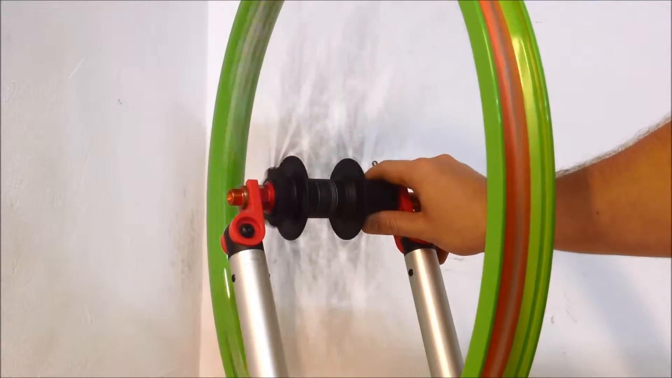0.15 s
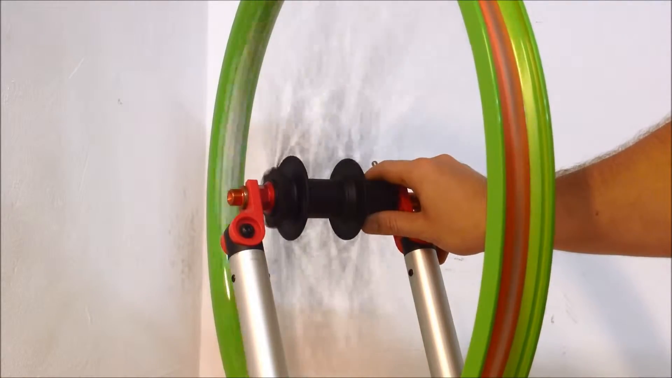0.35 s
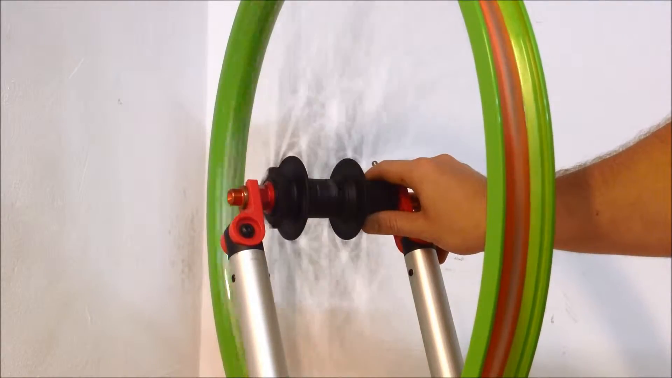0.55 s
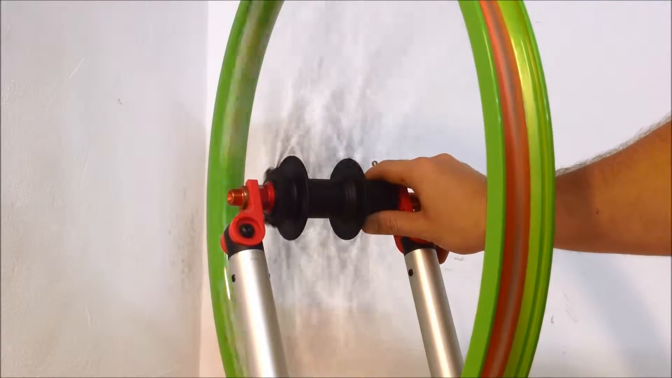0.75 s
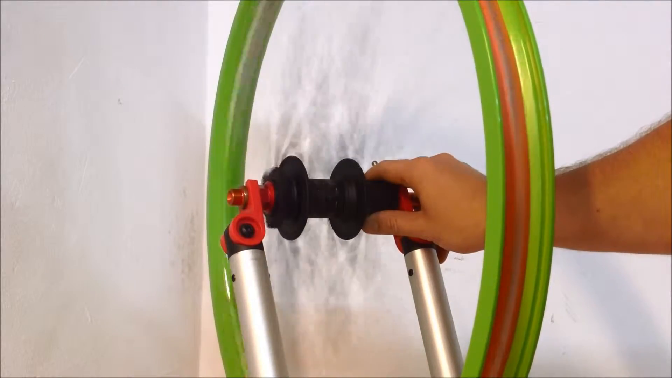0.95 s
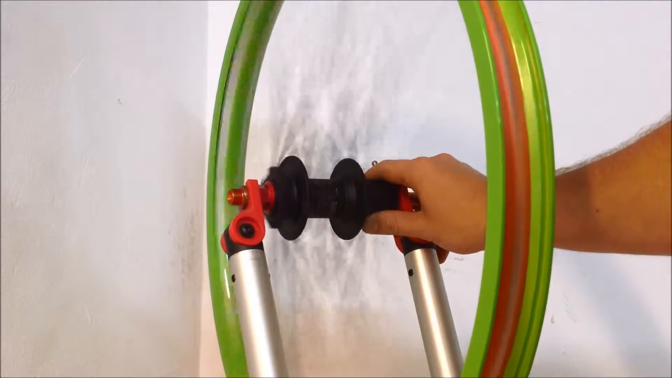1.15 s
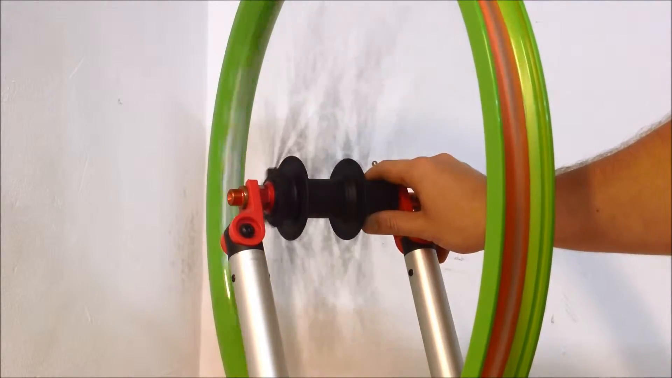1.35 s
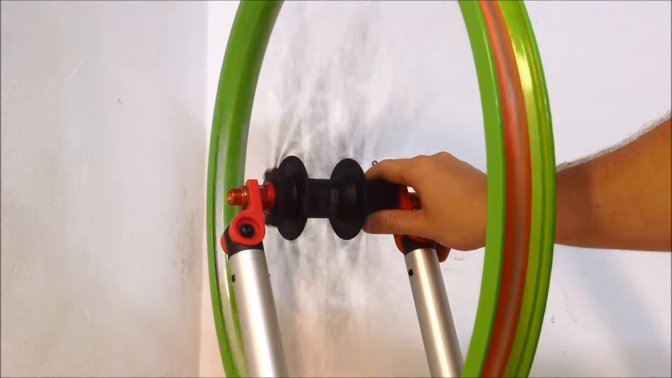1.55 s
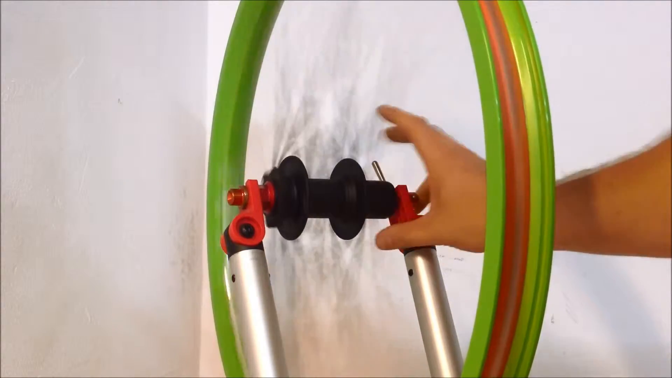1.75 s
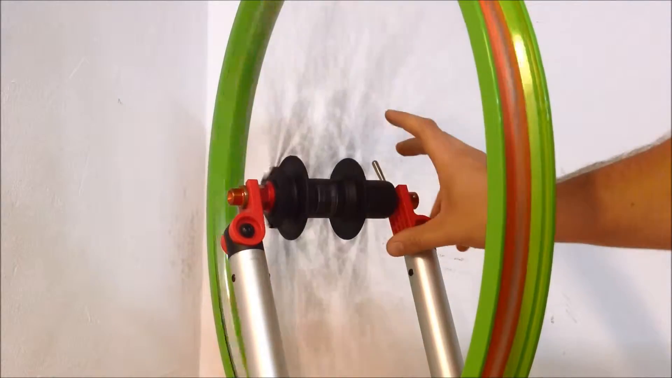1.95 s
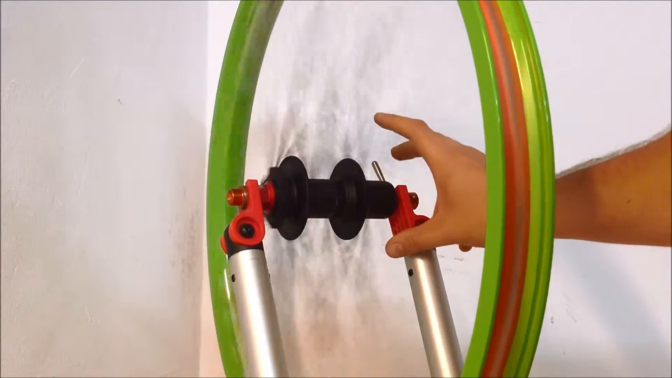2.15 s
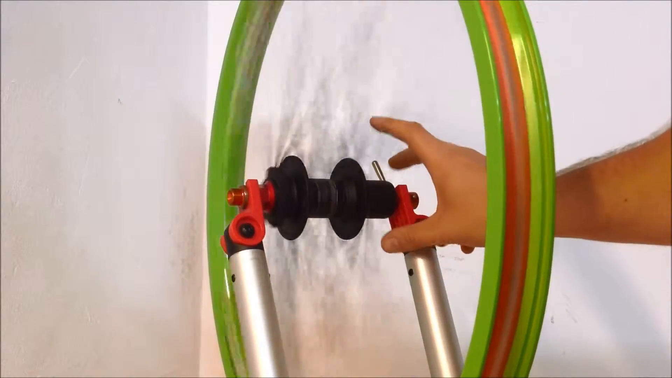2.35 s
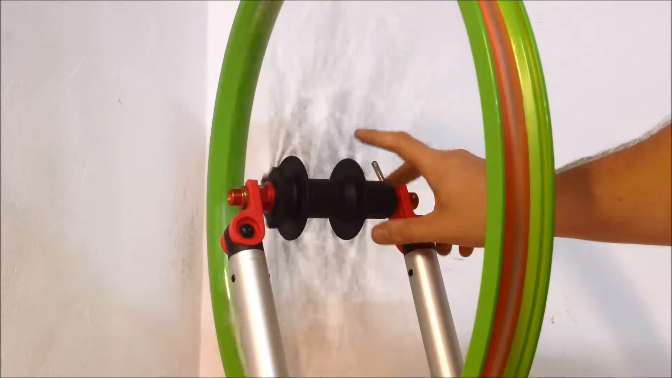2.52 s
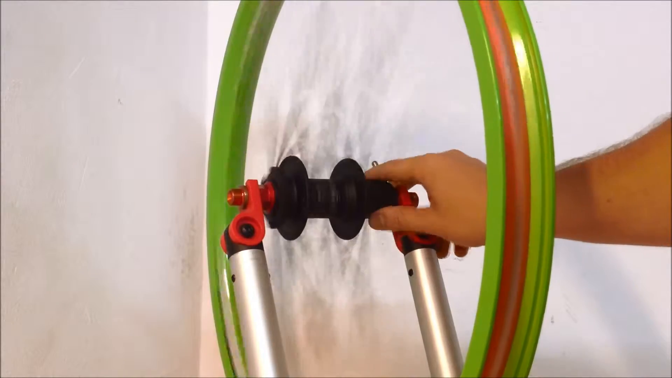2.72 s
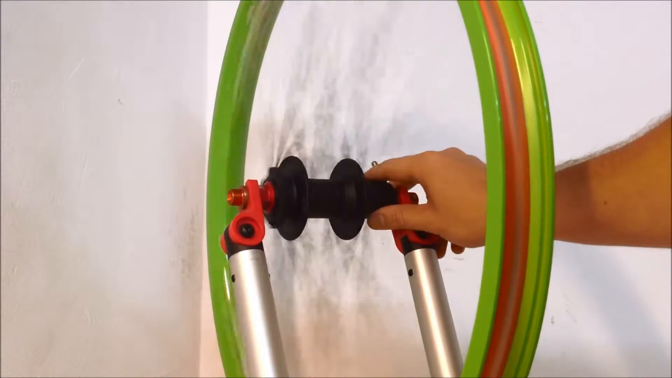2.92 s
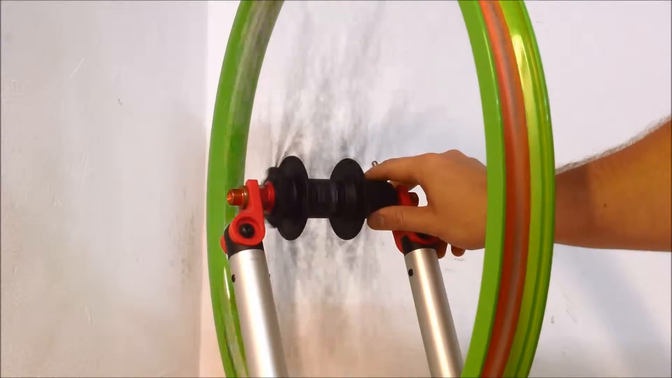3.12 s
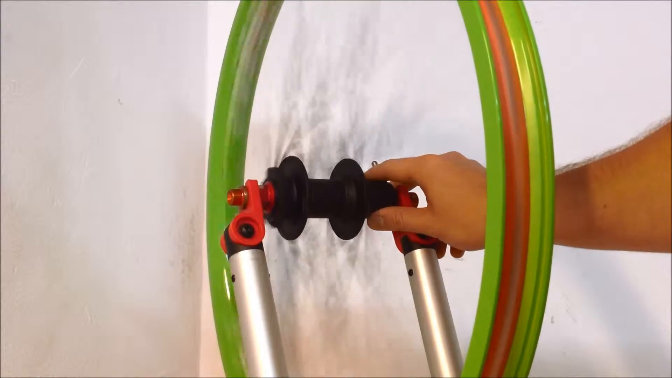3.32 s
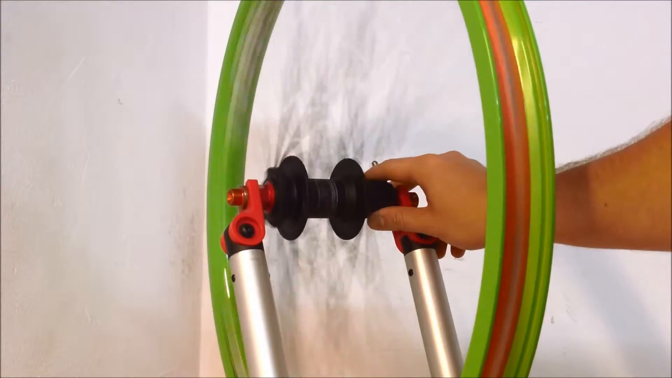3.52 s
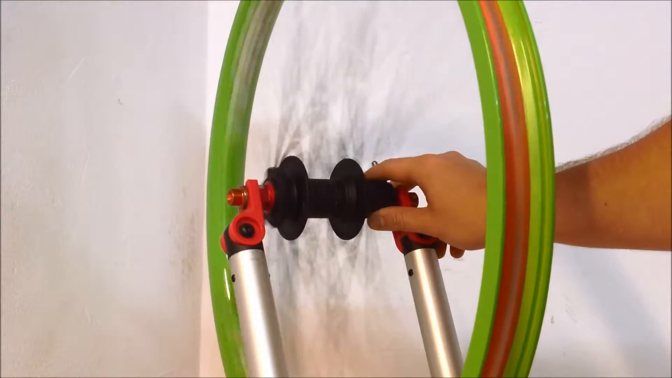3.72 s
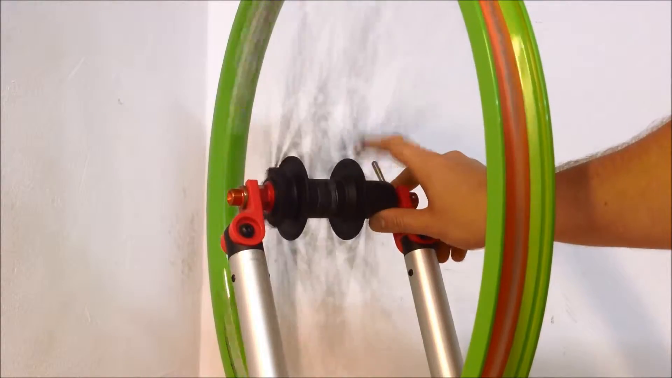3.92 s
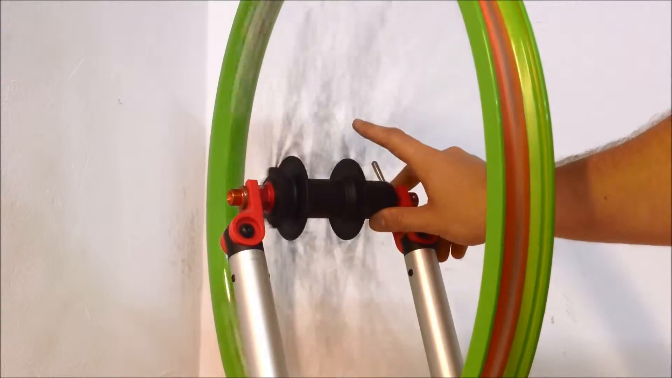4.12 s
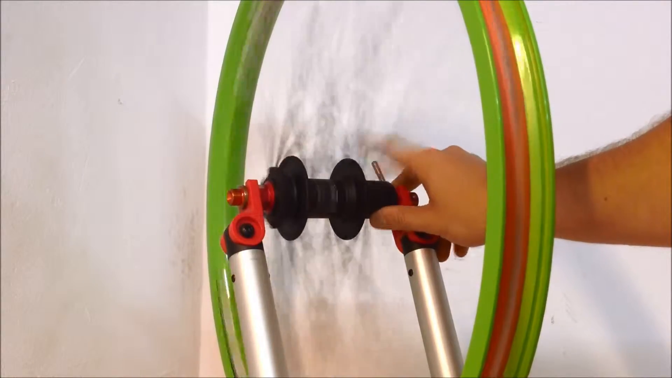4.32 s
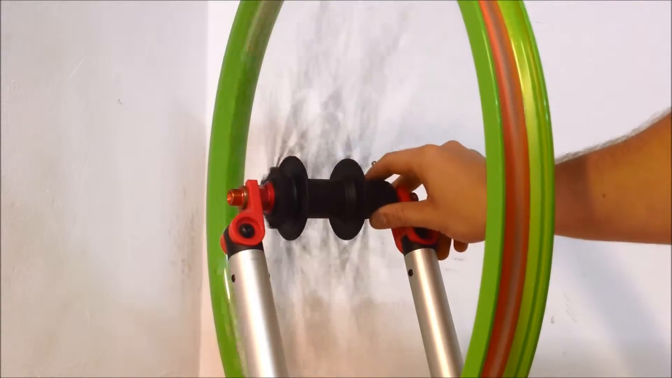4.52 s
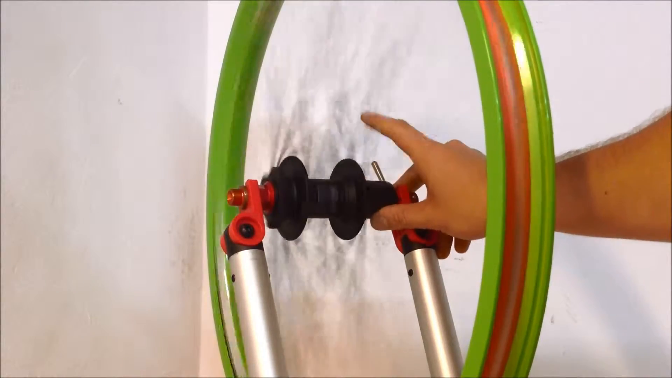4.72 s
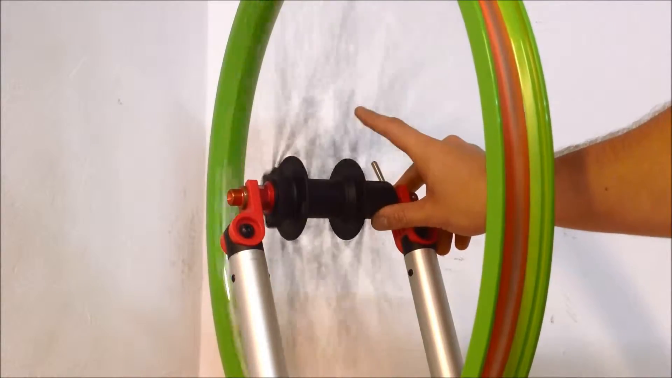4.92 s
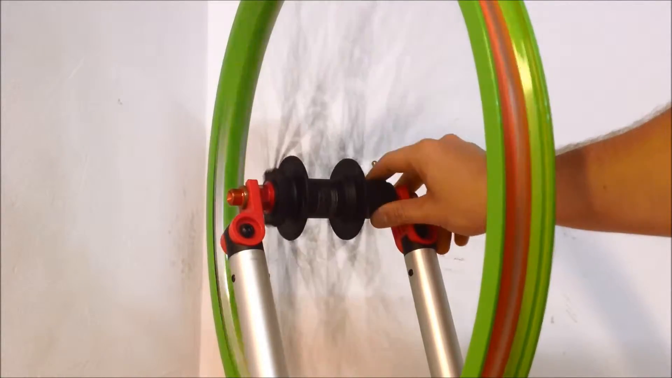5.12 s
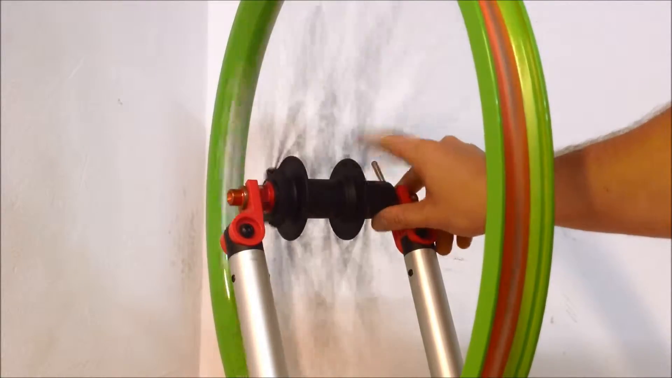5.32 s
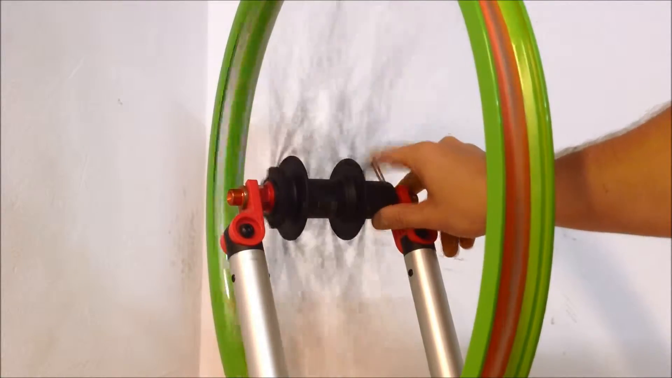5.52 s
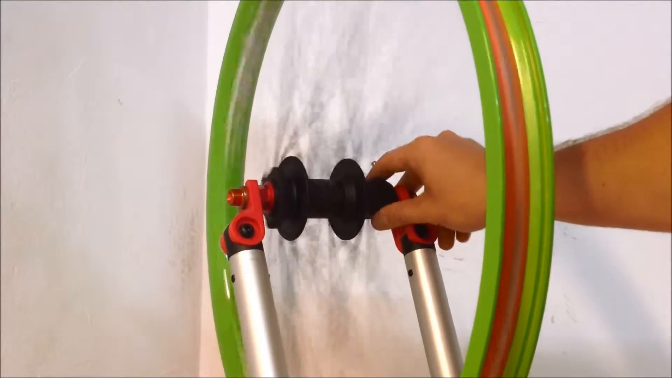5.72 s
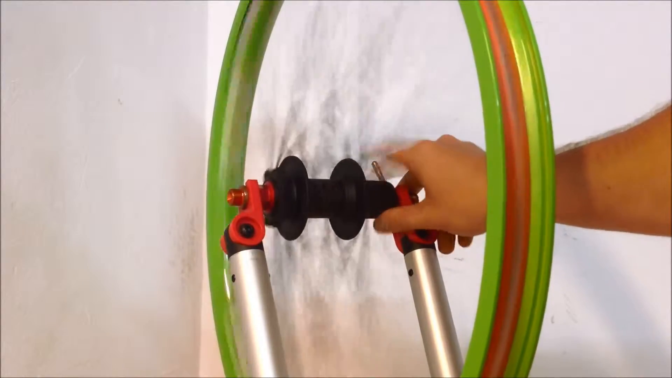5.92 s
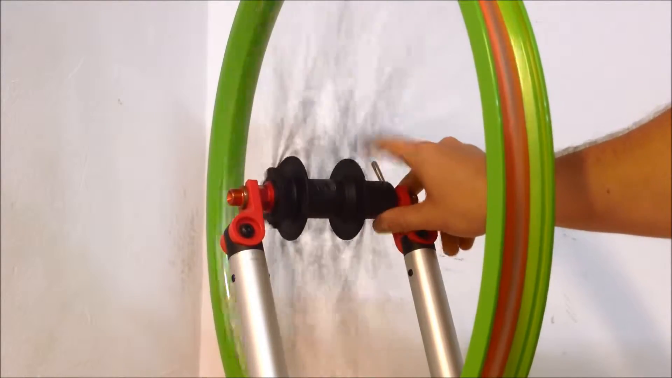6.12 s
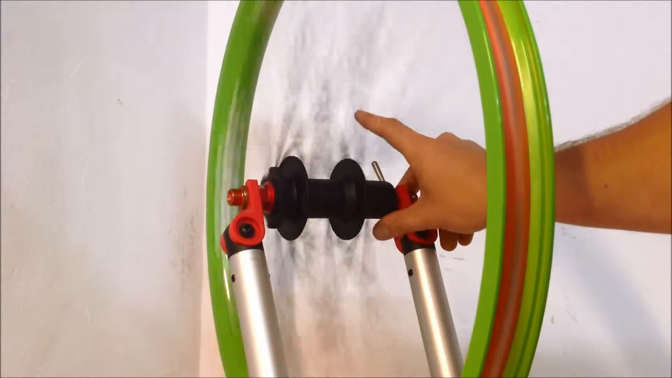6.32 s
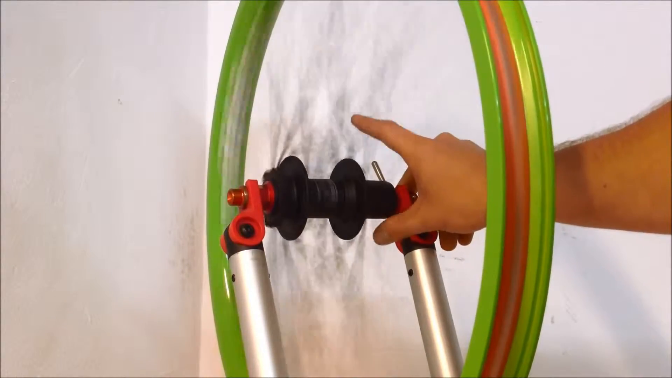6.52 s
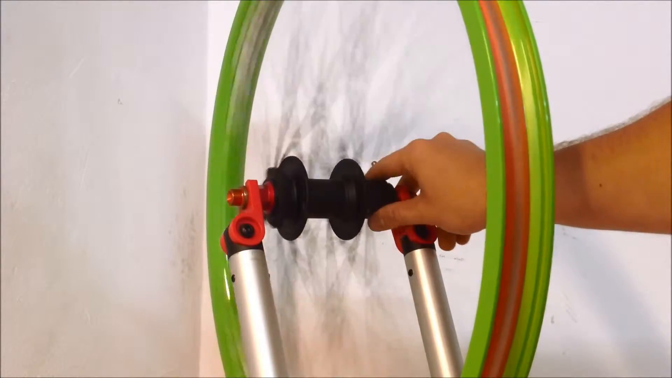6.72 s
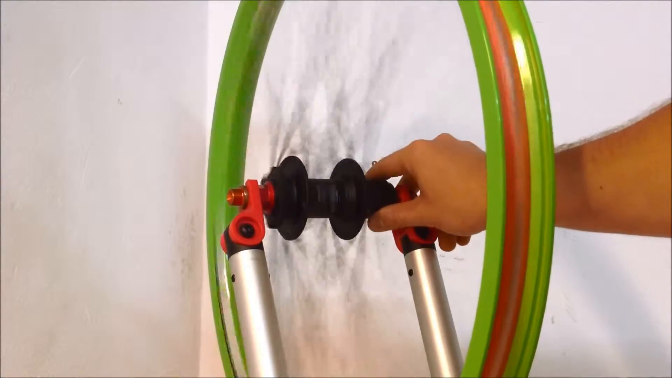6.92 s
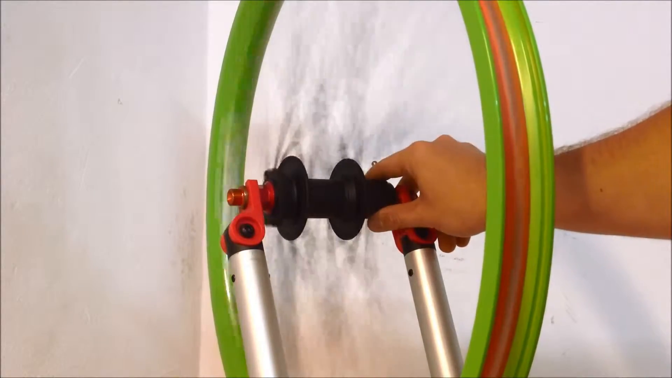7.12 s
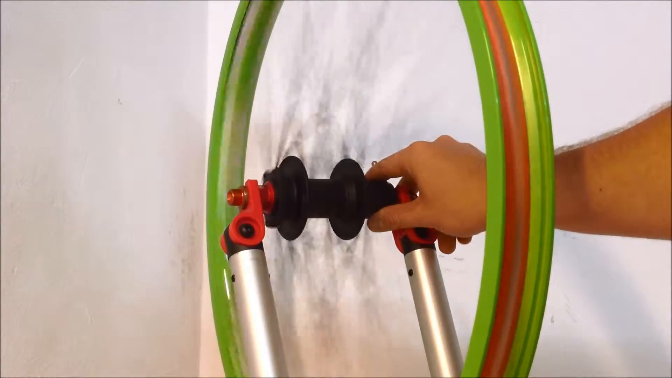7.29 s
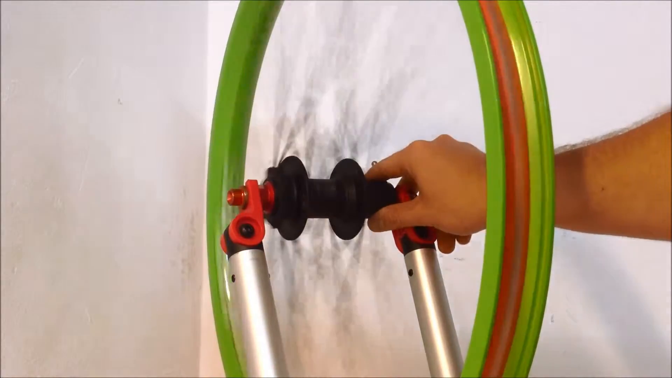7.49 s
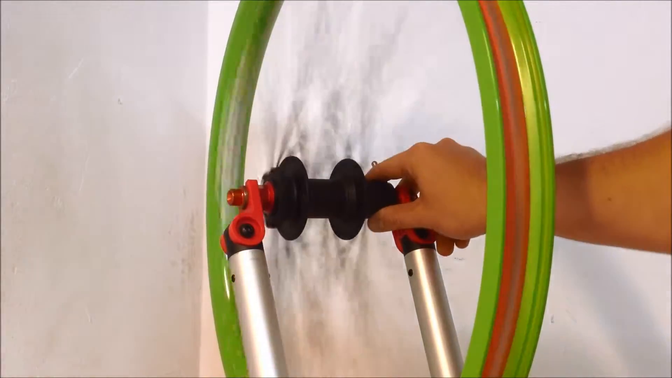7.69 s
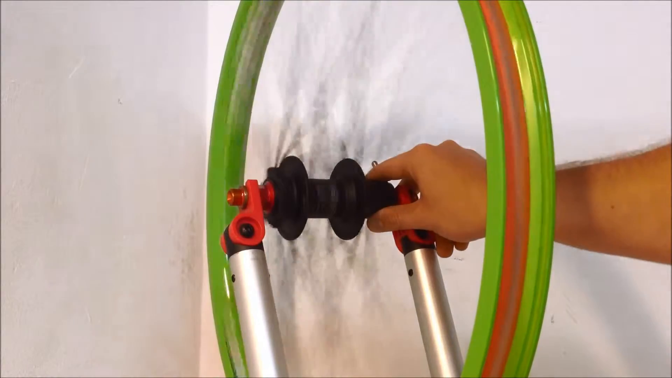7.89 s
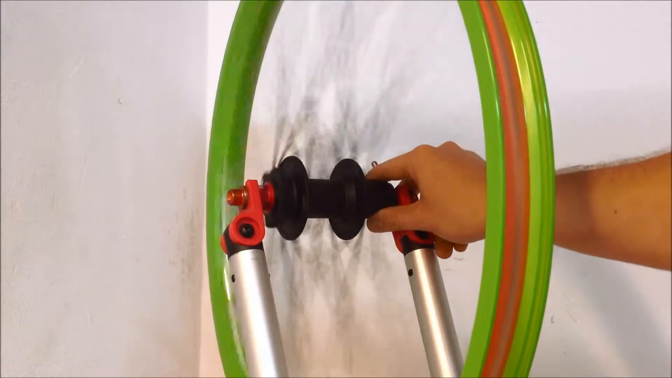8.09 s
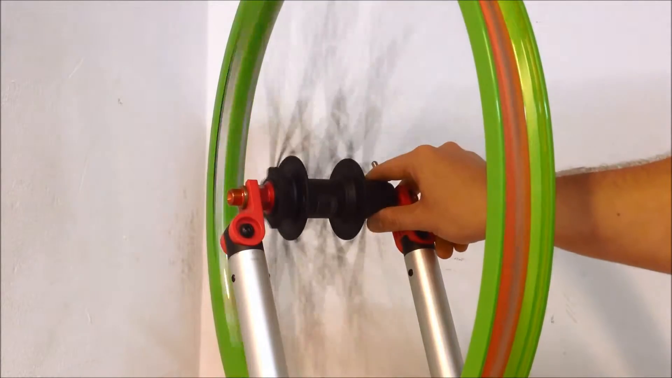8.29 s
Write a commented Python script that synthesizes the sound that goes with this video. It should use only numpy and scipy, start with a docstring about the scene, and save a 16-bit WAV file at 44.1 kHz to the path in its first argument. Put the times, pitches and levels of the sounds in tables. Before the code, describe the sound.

Close to a coasting bicycle wheel in a small hard room, crisp metallic ratchet clicks are already running, roughly forty-odd a second and gradually slowing, each a tiny bright volley with ringing rim and spokes. They stop at 1.7 s, leaving short room ring, faint low rumble, soft hiss, a light hand rustle and a dull bump near 2.1 s. At 2.8 s a tap and low thump of the stand bring the clicking back until 3.9 s. Rustles and bumps follow, then a burst at 4.4-4.7 s. From 5.0 to 6.2 s come stuttering bursts of only a few clicks, with grab thumps and one thin, bright late snap at 5.6 s. After a quiet gap, a thump at 6.7 s starts a steady final run, slower at about thirty-two clicks a second, with dull bumps beneath, lasting to the end around 8.3 s.

```python
"""Quick ratchet clicks come first, over a low rumble and a soft hiss: a bicycle wheel coasts in a truing stand
in a small hard room. Whenever a hand holds the freehub body still, its pawls drop off tooth after tooth,
slower as the wheel slows. Each click is a volley of tiny blows that makes rim and spokes ring.
Dull bumps are puffs of low noise; grabs add a tap and a thump of the stand, and one late tooth snaps brightly.
Soft rustles of shaped noise accompany the moving hand."""
import sys
import numpy as np
from scipy import signal
from scipy.fft import rfft, irfft, next_fast_len
from scipy.io import wavfile
from scipy.ndimage import map_coordinates

SR = 44100
rng = np.random.default_rng(int(sys.argv[2]) if len(sys.argv) > 2 else 0)


def wav_out(sig):
    """Save sig, one row per channel (or a flat mono array), as 16-bit PCM at SR to the path in sys.argv[1]."""
    wavfile.write(sys.argv[1], SR, np.round(np.clip(np.atleast_2d(sig).T, -1, 1) * 32767).astype(np.int16))


N = 368235
LEAD = SR // 4  # samples before the start, so that clicks already under way can ring in

# Times when the freehub is held: first click t/s, last click t/s, number of gaps between clicks,
# click level/dB, share by which the first gaps shrink, share by which the last gap grows
HOLDS = [(-0.181, 1.6904, 78, -5, 0, .12), (2.8093, 3.9374, 43, -5.5, .032, -.086),
         (4.409, 4.705, 11, -5.5, .073, .1), (4.976, 5.045, 2, -6.5, 0, -.03),
         (5.129, 5.306, 6, -5.5, .25, .17), (5.431, 5.57, 5, -5, .5, -.11), (5.619, 5.6225, 1, -9.5, 0, 0),
         (5.748, 5.865, 4, -5.5, .17, -.04), (6.016, 6.164, 5, -5.5, .37, -.04),
         (6.7372, 8.3367, 51, -6, .044, 0)]
SLOWING = .0013  # each gap grows by this share of a basic gap, per tooth, as the wheel slows
SETTLE_TEETH = 7.3  # the grab rocks the freehub backwards; it settles over about this many teeth
GRIP_DB = -.5  # change of the first click
SLIP_DB, SLIP_TEETH = -1.6, 1.15  # the last clicks weaken as the fingers let go

# Broad colour of a click: f/Hz, level/dB per Hz
CLICK_COLOUR = [(150, -59), (250, -22.5), (419, -20), (678, -21.5), (941, -10.5), (1140, -16), (1450, -5.5),
                (1600, -10), (2300, -5.5), (2980, -6), (3860, -1), (4210, 4.5), (4750, -4.5), (8090, 4.5),
                (15300, -6)]
# Ringing of rim and hub shell: f/Hz, width/Hz, level over the broad colour/dB
RIM_AND_HUB = [(435, 24, 9), (1802, 21, 8.5), (2514, 94, -1.5), (2773, 43, 3.5), (4290, 146, -2.5),
               (6400, 110, -10.5), (6680, 47, 0), (7166, 16, -3.5), (7970, 60, -10), (7880, 90, -8),
               (8440, 185, -4), (9300, 18, -38)]
# Narrow, long ringing of the spokes: f/Hz, width/Hz, level over the broad colour/dB
SPOKE_RINGS = [(1195, 2.5, 14), (1236, 3, 9), (1256, 14, 10), (1488, 30, 9), (1593, 2, 13), (1879, 4, 8),
               (1938, 4, 6), (2975, 18, 9), (3061, 12, 11), (3619, 35, 4)]
# Notes that the hub shell radiates weakly: f/Hz, width/Hz, depth/dB
WEAK_NOTES = [(4650, 220, 19), (4790, 190, 3.5)]
# Colour of the straight path against the room: f/Hz, level/dB
STRAIGHT_PATH = [(300, -20), (2000, -13), (4500, -3.5), (6000, 4), (8500, 1.5), (10500, -1.5),
                 (15000, -0.5)]
# How long the room rings: f/Hz, time to fade by 60 dB/s
ROOM_FADE = [(300, 0.37), (1200, 0.61), (2500, 0.42), (5500, 0.28), (10000, 0.28), (15000, 0.16)]

# Colour of the low rumble: f/Hz, level/dB per Hz
RUMBLE_COLOUR = [(18, -55), (30, -44), (119, -2), (160, -9.5), (199, -4.5), (318, -14), (348, -8.5),
                 (509, -13.5), (1000, -25.5), (1300, -40), (2200, -120)]
# Rumble level before wobble and bumps: t/s, level/dB
RUMBLE_LEVEL = [(0, -61.5), (1.3, -67), (1.7, -61), (2.65, -65), (4.1, -64), (5.4, -58), (7.4, -61.5),
                (8.35, -66)]
RUMBLE_UNDER_BUMP_DB, RUMBLE_LINGERS_S = -18, 0.1  # the rumble jumps at each bump and sinks back
# Colour of the rustle: f/Hz, level/dB per Hz
RUSTLE_COLOUR = [(400, -8), (800, -7.5), (1400, 1), (2200, -9), (4300, -11.5), (5200, -23), (9000, -25)]
# Soft rustles while the hand moves: loudest t/s, level before wobble/dB, fade/dB per s
HAND_MOVES = [(1.85, -63, 15), (4.24, -61.5, 42), (4.385, -56, 37), (4.9, -64, 20), (6.3, -61, 28)]
RUSTLE_RISE_DB_PER_S = 250
# Colour of the steady hiss: f/Hz, level/dB per Hz
HISS_COLOUR = [(300, -16), (500, -17), (800, -8.5), (2400, -11), (4300, -12.5), (5200, -16), (8500, -16),
               (10000, -21), (15300, -19)]
HISS_DB = -66.5

# Dull bumps: start t/s, strength/dB, length scale/s, centre f/Hz
DULL_BUMPS = [(2.087, -39.5, 0.051, 167), (2.235, -53, 0.046, 600), (3.7, -47.5, 0.078, 190),
              (4.216, -43, 0.059, 235), (4.292, -48.5, 0.027, 230), (4.695, -43, 0.14, 250),
              (5.611, -42, 0.024, 199), (6.155, -46, 0.059, 140), (6.32, -49, 0.053, 342),
              (6.409, -53, 0.03, 141), (6.603, -54.5, 0.024, 338), (7.09, -40, 0.058, 280),
              (7.212, -36.5, 0.034, 220), (7.743, -45, 0.1, 148), (7.979, -42, 0.037, 130)]

# The hand lands on the hub: t/s, thump level/dB, thump time to fade by 60 dB/s, tap level/dB
HAND_GRABS = [(2.78, -29.5, 0.14, -28.5), (4.407, -28, 0.21, -30), (5.116, -24.5, 0.25, -39),
              (5.417, -26, 0.14, -27.5), (5.717, -28.5, 0.16, -30), (6.004, -28, 0.19, -28.5),
              (6.697, -24, 0.093, -30.5)]
# Swinging stand legs, before small random changes: f/Hz, level/dB
STAND_LEGS = [(114, -3.5), (205, -16.5), (235, -17.5), (430, -22)]
# Ringing of the tapped tubes: f/Hz, width/Hz, level/dB
TUBE_RINGS = [(827, 55, -1.5), (1040, 190, -1.5), (1493, 24, 6), (2520, 80, -13), (3010, 15, -2),
              (3800, 150, -33)]

# Ringing of the snap: f/Hz, level/dB, time to fade by 60 dB/s
SNAP_RINGS = [(6400, -6, .03), (8230, 2, 0.044), (8540, -5, .03)]
SNAP_S, SNAP_DB, SNAP_RISE_S = 5.619, -18, 0.0028  # one tooth passes late with a thin, bright snap

# Microphone port: f/Hz, width/Hz, depth/dB (a negative depth is a boost)
MIC_PORT = [(9820, 1900, 3.5), (14400, 280, -6)]
TOP_HZ = 15360  # middle of the narrow fade at the top of the band


def amp(db):
    """Turn decibels into a plain factor."""
    return 10 ** (np.asarray(db) / 20)


def unit(x):
    """Scale a sound to an average (RMS) level of 1."""
    return x / np.sqrt(np.mean(x ** 2) + 1e-20)


def along(points, hz):
    """Read a curve of (f/Hz, value) points on a log frequency axis."""
    f, values = np.transpose(points)
    return np.interp(np.log(hz + 1), np.log(f + 1), values)


def filtered(x, response):
    """Multiply the spectrum of x by a response that depends on frequency."""
    m = next_fast_len(x.shape[-1] + SR)
    spectrum = rfft(x, m) * response(np.fft.rfftfreq(m, 1 / SR))
    return irfft(spectrum, m)[..., :x.shape[-1]]


def causal(points, hz):
    """Give a colour the timing of a struck object: nothing sounds before the blow."""
    cepstrum = irfft(np.log(amp(along(points, hz)) + 1e-6))
    half = len(cepstrum) // 2
    # folding the later half onto the earlier one moves all sound after the blow
    cepstrum[1:half] *= 2
    cepstrum[half + 1:] = 0
    return np.exp(rfft(cepstrum))


def peak(hz, centre_hz, width_hz):
    """One resonance, 1 at its centre; a narrower one rings longer."""
    return 1j * hz * width_hz / (centre_hz ** 2 - hz ** 2 + 1j * hz * width_hz)


def resonances(hz, table):
    """Add up several resonances, as in an object that rings at several notes."""
    return sum(amp(db) * peak(hz, centre, width) for centre, width, db in table)


def dip(hz, centre_hz, width_hz, depth_db):
    """Weaken a narrow band around one note; a negative depth boosts it."""
    return 1 - (1 - amp(-depth_db)) * peak(hz, centre_hz, width_hz)


def wobble(rate):
    """A smooth random curve with the given number of knots a second."""
    knots = rng.standard_normal(int(N * rate / SR) + 4)
    return map_coordinates(knots, [np.arange(N) * rate / SR])


def room(x):
    """Each frequency dies at its own speed; the turning wheel faces the walls anew, so each row has its own tail."""
    hz, t, z = signal.stft(rng.standard_normal((len(x), SR)), SR, nperseg=256)
    fade = amp(-60 * t / along(ROOM_FADE, hz)[:, None])
    tail = signal.istft(z * fade, SR, nperseg=256)[1]
    after = np.arange(tail.shape[1]) / SR
    tail *= 1 - np.exp(-after / 0.00085)  # the first echoes need a moment to arrive
    tail *= 1 + amp(-7.5) * np.exp(-after / 0.0019)  # surfaces close by answer first and loudest
    tail /= np.linalg.norm(tail, axis=1, keepdims=True)
    return signal.fftconvolve(x, tail, axes=1)[:, :x.shape[1]].sum(0)


def clicks():
    """Time and level of every tooth: the gaps lengthen as the wheel slows."""
    times, levels = [], []
    for first, last, gaps, db, hurry, drag in HOLDS:
        k = np.arange(round(gaps) + 1)
        gap = 1 + SLOWING * k[:-1] - hurry * np.exp(-k[:-1] / SETTLE_TEETH)
        gap[-1] += drag
        passed = np.append(0, np.cumsum(gap)) / gap.sum()
        times += list(first + (last - first) * passed)
        slip = SLIP_DB * np.exp((k - k[-1]) / SLIP_TEETH)
        levels += list(db + GRIP_DB * (k == 0) + slip)
    return np.array(times), np.array(levels)


def pawls(count=24, channels=4):
    """The pawls never land together: each click is a short volley of landings and weaker rebounds."""
    times, levels = clicks()
    chance = rng.random((len(times), count + 2))
    late = -np.log(1 - chance[:, :count]) * .0025 + .0012 * rng.random((len(times), count))  # seconds
    late[:, :3] *= .15  # the leading pawls snap down almost at once
    uneven = .0012 * (chance[:, count:count + 1] - .5)  # seconds; teeth are not cut quite alike

    # later landings are weaker; up or down is random
    size_db = 2.8 * rng.standard_normal(late.shape) - 60 * late / 0.11
    size = np.sign(rng.standard_normal(late.shape)) * amp(size_db)
    size /= np.linalg.norm(size, axis=1, keepdims=True)
    size *= amp(levels + 1.15 * chance[:, -1])[:, None]

    blows = np.zeros((channels, LEAD + N + SR))
    at = np.round((times[:, None] + uneven + late) * SR).astype(int) + LEAD
    row = np.arange(len(times))[:, None] % channels + 0 * at  # clicks take turns between the room tails
    np.add.at(blows, (row, at), size)

    def wheel(hz):
        ringing = 1 + resonances(hz, RIM_AND_HUB + SPOKE_RINGS)
        return causal(CLICK_COLOUR, hz) * ringing * dip(hz, *WEAK_NOTES[0]) * dip(hz, *WEAK_NOTES[1])

    struck = filtered(blows, wheel)
    straight = filtered(struck.sum(0), lambda hz: causal(STRAIGHT_PATH, hz))
    return (straight + amp(6.5) * room(struck))[LEAD:LEAD + N]


def coloured_noise(points):
    """Random noise with the given balance of low and high notes, at level 1."""
    return unit(filtered(rng.standard_normal(N), lambda hz: amp(along(points, hz))))


def rumble():
    """Low noise of uneven loudness that jumps at each bump and sinks back."""
    t = np.arange(N) / SR
    base = amp(np.interp(t, *np.transpose(RUMBLE_LEVEL)))
    swell = sum(amp(db + RUMBLE_UNDER_BUMP_DB) * (t > s) * np.exp(-abs(t - s) / RUMBLE_LINGERS_S)
                for s, db, *_ in DULL_BUMPS)
    return (base + swell) * amp(2.5 * wobble(13)) * coloured_noise(RUMBLE_COLOUR)


def hiss():
    """Smooth noise at a steady level."""
    return amp(HISS_DB) * coloured_noise(HISS_COLOUR)


def rustle():
    """Flickering noise that rises quickly and fades while the hand moves."""
    t = np.arange(N) / SR
    moves = sum(amp(db - np.where(t < s, RUSTLE_RISE_DB_PER_S, fade) * abs(t - s))
                for s, db, fade in HAND_MOVES)
    return moves * amp(1.8 * wobble(30)) * coloured_noise(RUSTLE_COLOUR)


def bumps():
    """Short puffs of noise around a mostly low note that swell and fade."""
    out = np.zeros(N + SR)
    for s, db, length, centre_hz in DULL_BUMPS:
        puff = filtered(rng.standard_normal(SR // 4), lambda hz: peak(hz, centre_hz, 1.03 * centre_hz) ** 2)
        u = np.arange(len(puff)) / SR / length
        swell = 1.4 * u * np.exp(-2.2 * u * u)
        out[round(s * SR):][:len(u)] += amp(db) * unit(puff) * swell
    return out[:N]


def hand():
    """Each grab taps the tubes, and the push that follows swings the stand's legs."""
    out, t = np.zeros(N + SR), np.arange(SR // 2) / SR
    for s, db, t60, tap_db in HAND_GRABS:
        # every grab excites the legs a little differently
        swing = sum(amp(level + rng.normal(0, 1.8)) * np.cos(2 * np.pi * hz * rng.normal(1, 0.037) * t)
                    for hz, level in STAND_LEGS)
        swing *= amp(db - 60 * t / t60) * (1 - np.exp(-(t / 0.0074) ** 2))  # soft start, then fading
        touch = rng.standard_normal(len(t)) * amp(tap_db - 60 * t / 0.29)
        tap = filtered(touch, lambda hz: resonances(hz, TUBE_RINGS))
        out[round(s * SR):][:len(t)] += swing + tap
    return out[:N]


def snap():
    """A few high tones ring briefly together over the late tooth."""
    out, t = np.zeros(N), np.arange(SR // 4) / SR
    ring = sum(amp(db - 60 * t / t60) * np.sin(2 * np.pi * hz * t) for hz, db, t60 in SNAP_RINGS)
    rise = 1 - np.exp(-(t / SNAP_RISE_S) ** 2)
    out[round(SNAP_S * SR):][:len(t)] = amp(SNAP_DB) * ring * rise
    return out


def scene():
    """Add all the sounds together into one channel."""
    return (pawls() + rumble() + hiss() + rustle() + bumps() + hand() + snap())[None]


def record(dry):
    """The microphone drops the deep bass, its port dips one note and lifts another, and the top is cut off."""
    def microphone(hz):
        port = np.prod([dip(hz, *row) for row in MIC_PORT], axis=0)
        bass = 1j * hz / (90 + 1j * hz)  # weaker below about 90 Hz
        top = np.clip((TOP_HZ - hz) / 120 + .5, 0, 1) ** 3
        return port * bass * top

    return filtered(dry, microphone)


dry = scene()
out = record(dry)
wav_out(out)
```